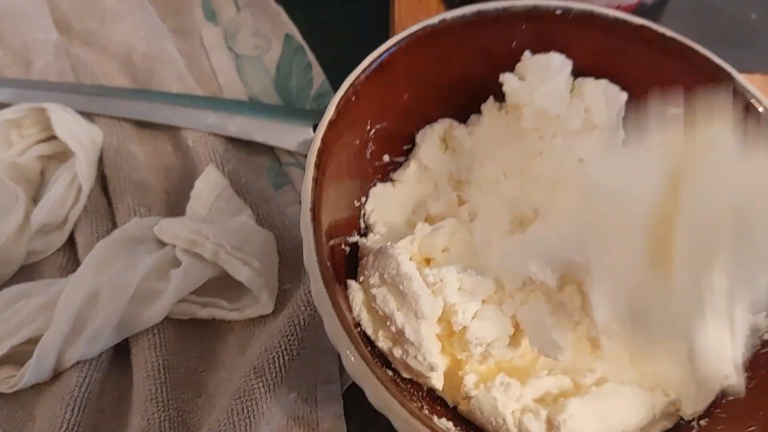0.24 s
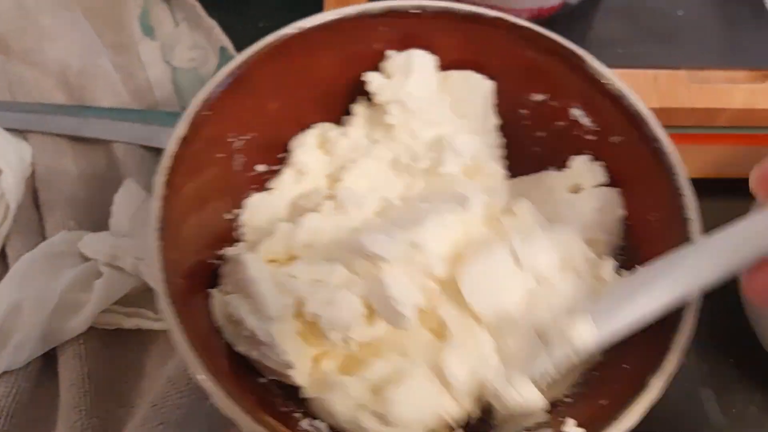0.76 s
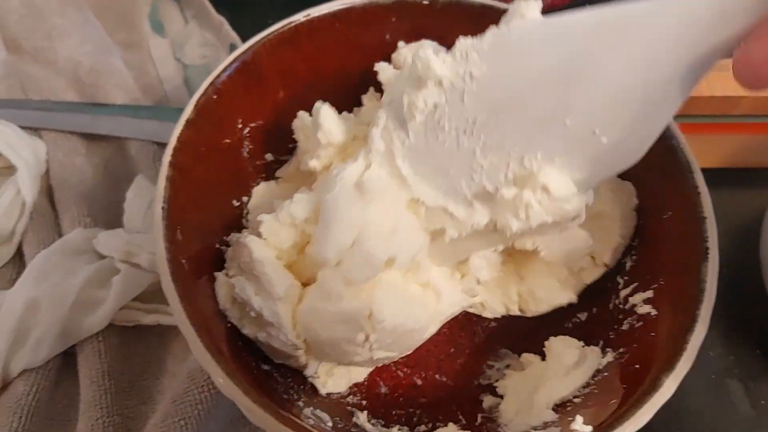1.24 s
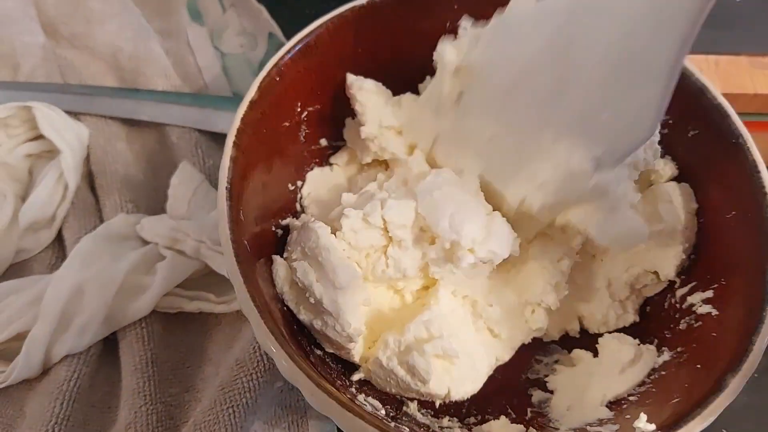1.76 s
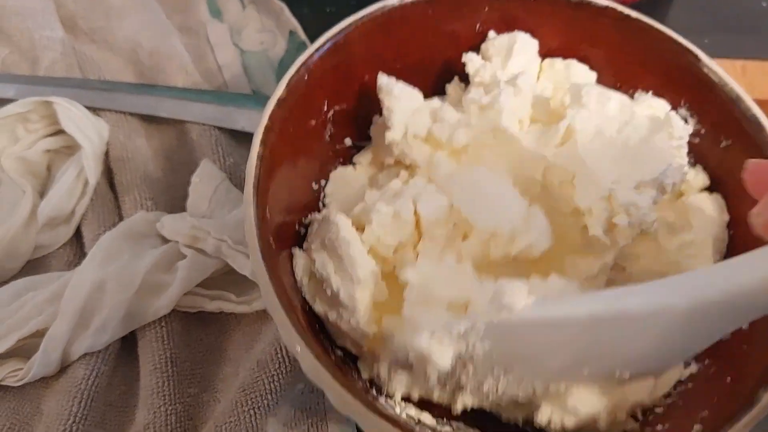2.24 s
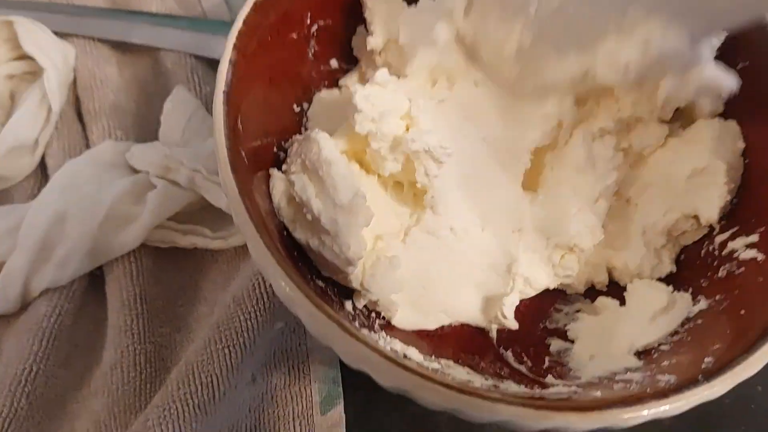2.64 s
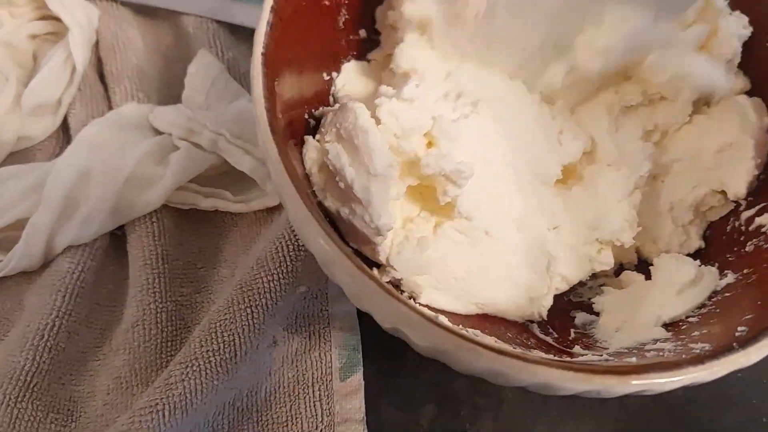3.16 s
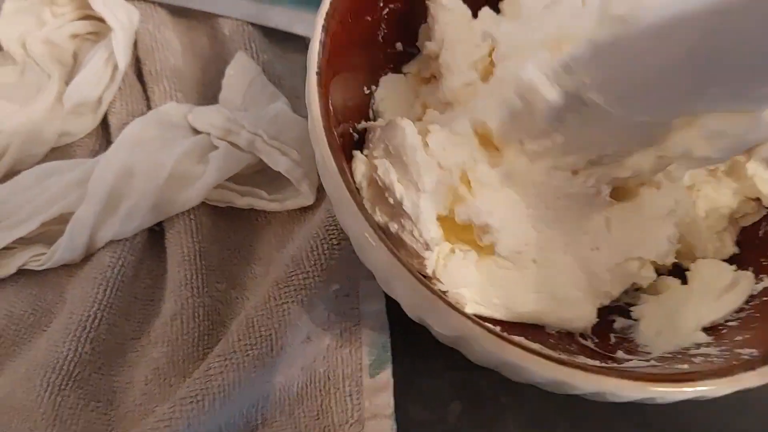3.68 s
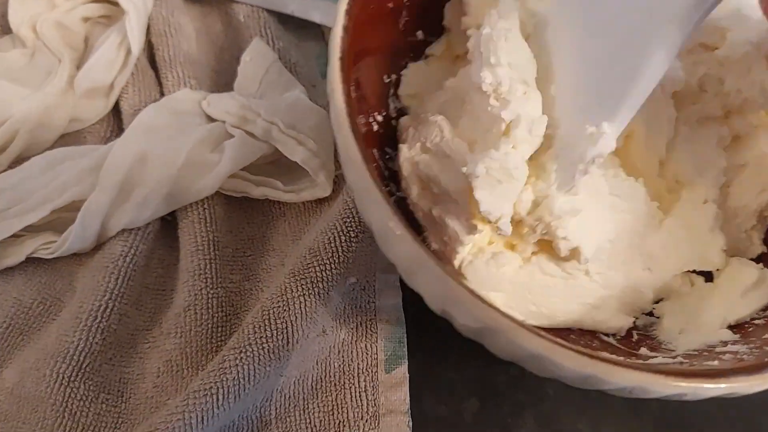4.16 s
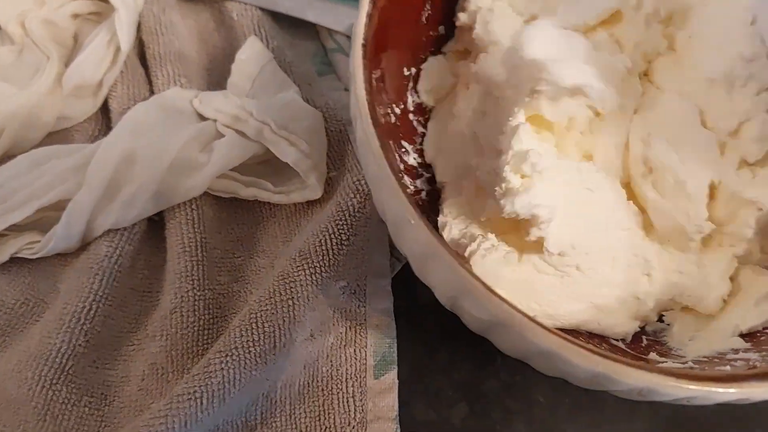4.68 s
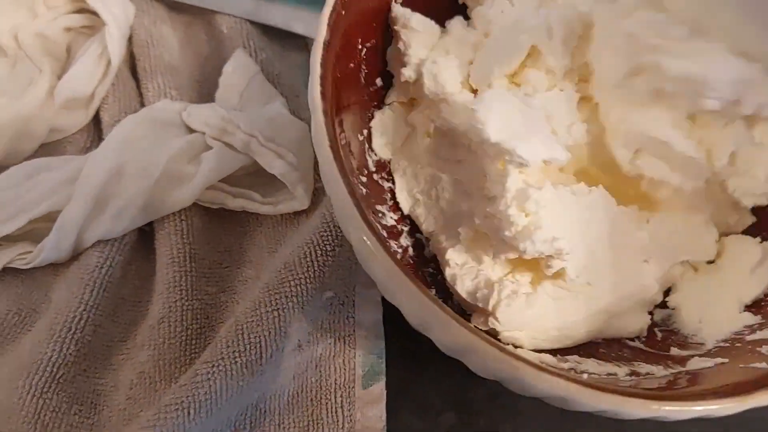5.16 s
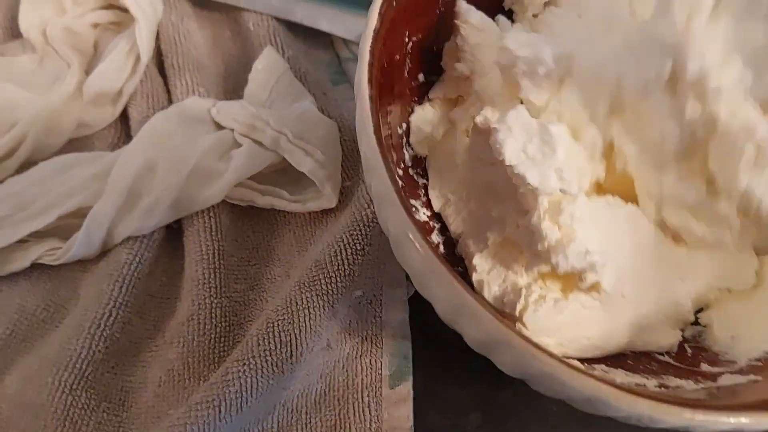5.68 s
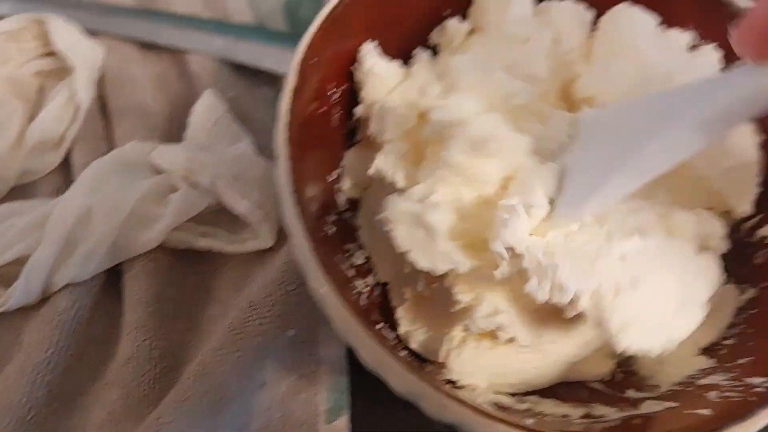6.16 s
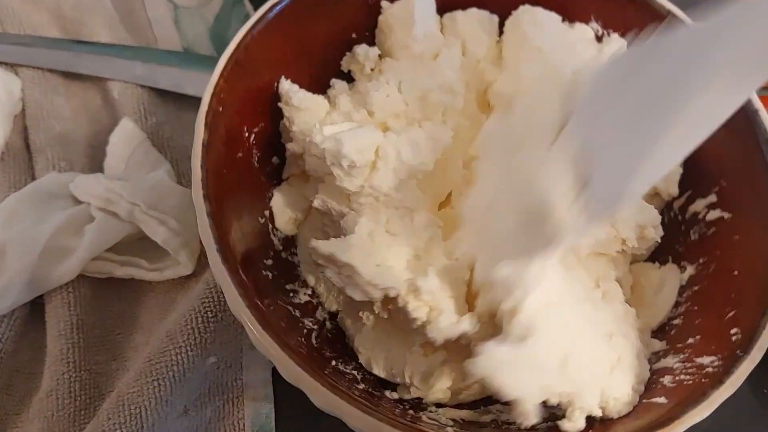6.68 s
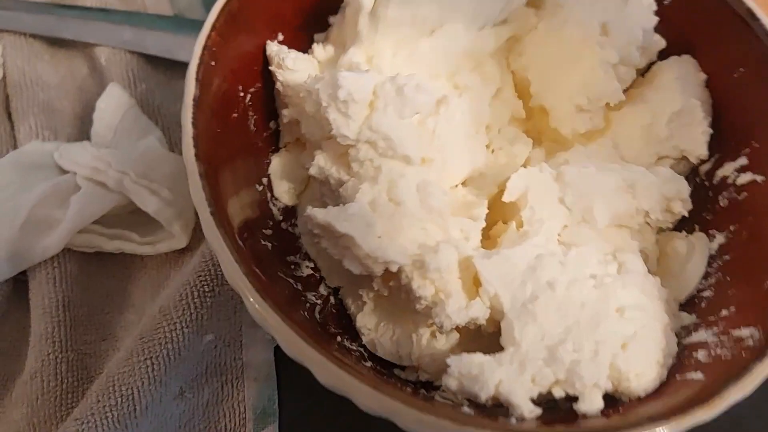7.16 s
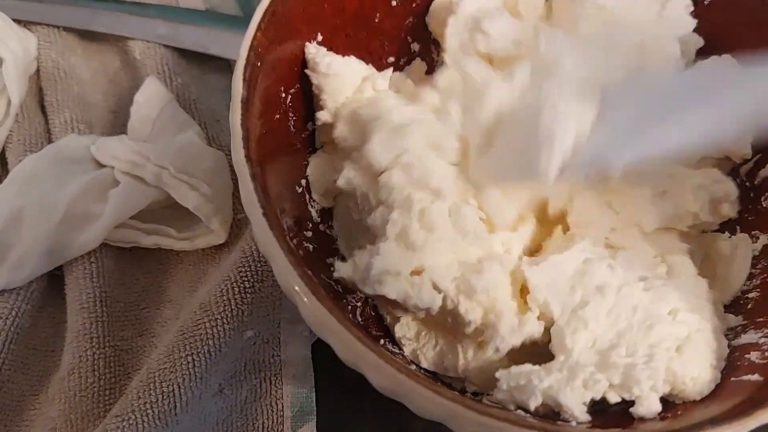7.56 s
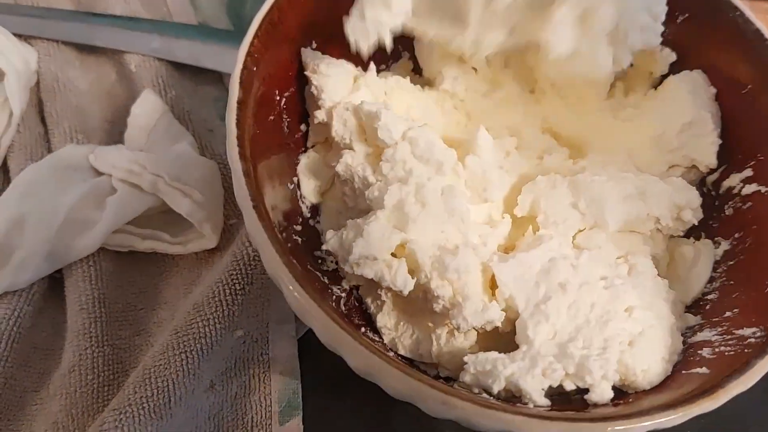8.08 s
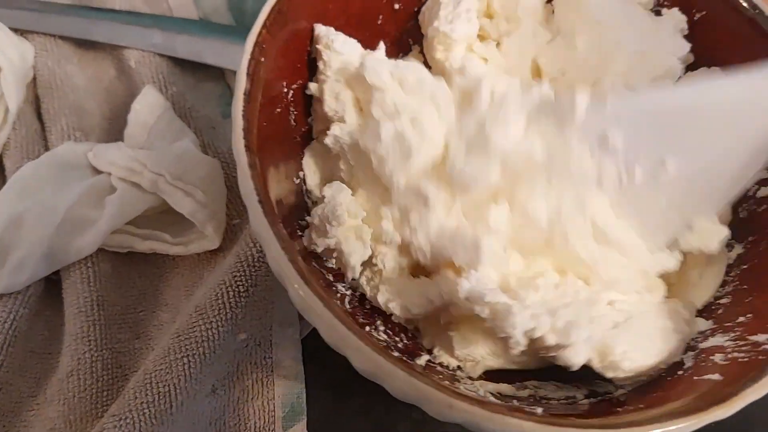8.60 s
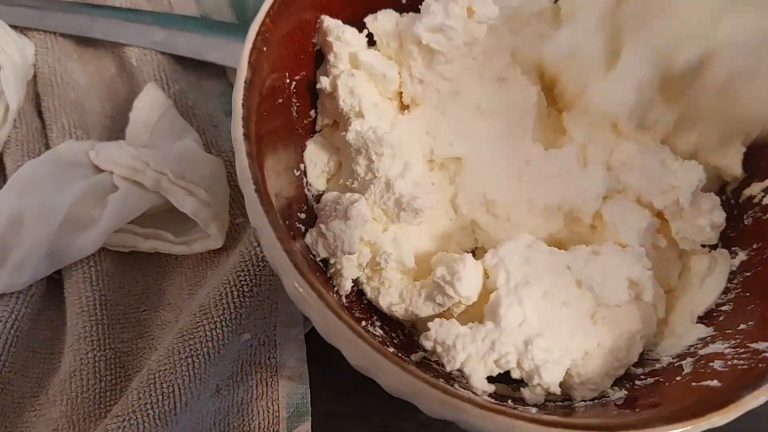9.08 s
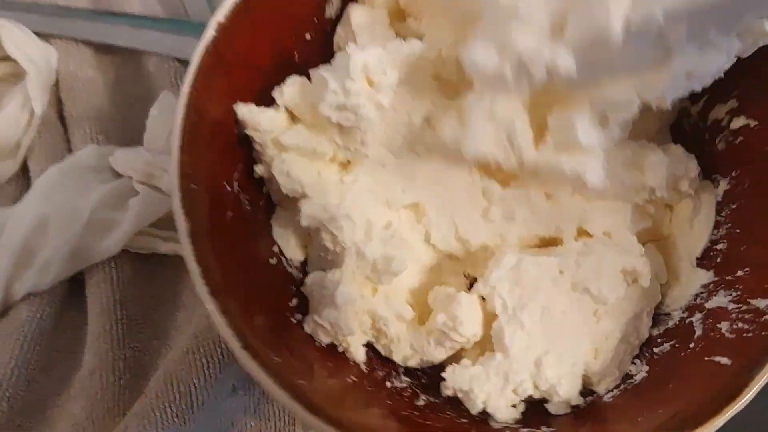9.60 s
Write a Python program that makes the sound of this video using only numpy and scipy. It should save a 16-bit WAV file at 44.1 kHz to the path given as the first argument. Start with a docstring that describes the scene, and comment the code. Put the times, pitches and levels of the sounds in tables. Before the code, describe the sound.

Close wet squishing and scraping of thick curd in a heavy bowl, broken by sudden loud ceramic clunks, with an appliance droning softly behind.

```python
"""First a kitchen hum starts a little quieter and comes up to its level while soft cheese fizzes; then a
spatula mashes it in a ceramic bowl on a towel. Wet curd smears and pops: showers of tiny clicks, rising notes
and short noise bursts. The blade rubs the glaze as filtered stick-slip clicks; the rim, the bowl and the
counter ring as fading tones. The hardest knocks overload the close phone microphone and make its gain control
duck."""
import sys
import numpy as np
from scipy import signal
from scipy.fft import rfft, irfft, next_fast_len
from scipy.io import wavfile
from scipy.ndimage import uniform_filter1d, minimum_filter1d, map_coordinates

SR = 44100
rng = np.random.default_rng(int(sys.argv[2]) if len(sys.argv) > 2 else 0)


def unload_wav(signal):
    """Save mono or channel-first audio to the path in sys.argv[1] as 16-bit WAV at rate SR, clipped to [-1, 1]."""
    wavfile.write(
        sys.argv[1],
        SR,
        np.round(np.clip(np.atleast_2d(signal).T, -1, 1) * 32767).astype(np.int16),
    )


N = 433944
TOP_HZ = 16000  # highest filter frequency, and where the microphone cuts the top
T = np.arange(N) / SR  # seconds
RING = T[:SR // 2]  # half a second, the longest that one blow or pop may last


def undb(db):
    """Turn decibels into gain."""
    return 10 ** (np.asarray(db) / 20)


def unit(x):
    """Scale to rms 1."""
    return x / np.sqrt(np.mean(x ** 2) + 1e-18)


def colour(x, points):
    """Shape the spectrum of x along a curve of (Hz, dB) points."""
    hz, db = np.transpose(points)
    length = x.shape[-1]
    padded_length = next_fast_len(length, True)
    padded = np.pad(x, [(0, 0), (0, padded_length - length)])
    bin_hz = np.fft.rfftfreq(padded_length, 1 / SR) + 1e-3  # keeps the logarithm finite
    gain = undb(np.interp(np.log(bin_hz), np.log(hz), db))
    return irfft(rfft(padded) * gain, padded_length)[:, :length]


def resonate(x, hz, width_hz):
    """Let x excite one resonance, with gain 1 at its centre."""
    sharpness = hz / min(width_hz, TOP_HZ)
    return signal.lfilter(*signal.iirpeak(min(hz, TOP_HZ), sharpness, fs=SR), x)


def soften(x, hz):
    """Roll off the treble gently above hz, as a soft contact does because it pushes longer."""
    return signal.lfilter(*signal.butter(1, min(hz, TOP_HZ), fs=SR), x)


def walk(rate):
    """Drift randomly in straight lines between `rate` knots per second, with a spread near 1."""
    knots = rng.standard_normal(N // 100)
    return 1.2 * np.interp(T * rate, np.arange(len(knots)), knots)


def pair(size, split_hz=650, likeness=0.77):
    """Make noise for two close microphones: alike in the bass, unrelated in the treble."""
    mid, side = rng.standard_normal((2, size))
    side = side - likeness * soften(side, split_hz)
    return np.array([mid + side, mid - side])


def add(out, s, sound):
    """Mix a sound in at time s."""
    start = int(np.clip(s * SR, 0, N - 1))
    out[:, start:start + sound.shape[-1]] += sound[:, :N - start]


def grains(rate, spread_db, shared=0.034):
    """Scatter clicks of uneven size, `rate` per second, partly heard by both microphones; rms 1."""
    size = undb(spread_db * np.minimum(rng.exponential(size=N), 6))
    struck = rng.random(N) < rate / SR
    chance = rng.standard_normal((3, N))
    return unit(size * struck * (chance[:2] + shared * chance[2]))


def ring(modes, lag_s, skew_limit=0.61, ring_times=1, spread=0.0028):
    """One blow sets off fading tones; neighbours swing opposite ways, a little out of step left to right."""
    hz, db, t60 = np.transpose(modes)[:, :, None]
    detune = 1 + spread * rng.standard_normal(hz.shape)
    turn = (-1) ** np.arange(len(hz))[:, None]
    skew = np.minimum(np.pi * hz * lag_s, skew_limit) * turn
    fade = turn * undb(db - 60 * RING / (t60 * ring_times))
    swing = 2 * np.pi * hz * detune * RING
    return np.array([(fade * np.sin(swing + way * skew)).sum(0) for way in (1, -1)])


def blow(x):
    """Scale a blow so that its first fiftieth of a second peaks near 1."""
    return x / (2.58 * np.sqrt(np.mean(x[:, :SR // 50] ** 2)))


def press(top_s, swell_s, release_s, roundness=1.03):
    """Force of one press: it builds until the curd gives way, then lets go (roundness 1: pointed, 2: round)."""
    away = np.maximum((top_s - T) / swell_s, (T - top_s) / release_s)
    return np.exp(-np.clip(away, 0, 6) ** roundness)


# The blade presses into the curd. Each row: hardest moment in seconds, swell in seconds,
# release in seconds, smear level in dB, fizz of tearing films in dB relative to the smear.
PRESSES = [(0.03, 0.033, 0.058, -56, 8), (0.41, 0.18, 0.079, -43.5, -7), (0.69, 0.58, 0.09, -40.5, -7.5),
           (0.9, 0.14, 0.32, -38, -1), (1.27, 0.16, 0.2, -39.5, -2), (1.745, 0.049, 0.075, -40.5, 3.5),
           (1.85, 0.13, 0.28, -43.5, -6), (2.42, 0.27, 0.12, -48.5, 2), (3.02, 0.57, 1, -45, -3),
           (3.47, 0.022, 0.074, -46, 2.5), (3.715, 0.054, 0.06, -36.5, -0.5),
           (4.21, 0.084, 0.13, -40, -2.5), (4.315, 0.029, 0.033, -37.5, -0.5),
           (4.72, 0.086, 0.19, -40.5, -6), (4.96, 0.11, 0.096, -38, -4), (5.24, 0.024, 0.015, -37, -2),
           (5.44, 0.035, 0.057, -40.5, -1.5), (5.66, 0.14, 0.089, -37, -7), (5.94, 0.11, 0.069, -38.5, -6),
           (6.34, 0.089, 0.041, -41, -5), (6.71, 0.095, 0.072, -34, -8), (7.02, 0.24, 0.25, -44, -10),
           (7.36, 0.14, 0.13, -42.5, -2), (8.04, 0.33, 0.1, -44, -3.5), (8.32, 0.017, 0.19, -43, -14),
           (8.77, 0.58, 0.14, -46.5, -4), (9.57, 0.16, 0.047, -40, -4.5), (9.695, 0.028, .025, -46, 0)]
# Tone colour of the smear. Each row: frequency in Hz, relative level in dB.
SMEAR_COLOUR = [(300, 18.5), (900, 1.5), (2200, 1), (3300, -1), (4700, 1.5), (8000, -11), (9400, -12),
                (16000, -21)]
# Tone colour of the fizz. Each row: frequency in Hz, relative level in dB.
FIZZ_COLOUR = [(2000, -9.5), (6000, -3), (8200, 0.5), (9400, -10), (11000, -1), (12600, 0), (16000, 0)]


def curd(creep_smear_db=-46.5, creep_fizz_db=-55, flicker_db=2.5):
    """Countless tiny films tear under the blade: a dense smear with a finer fizz on top, in small spurts."""
    # between presses the blade keeps creeping through the cheese
    smear_power, fizz_power = undb(creep_smear_db) ** 2, undb(creep_fizz_db) ** 2
    for top_s, swell_s, release_s, db, fizz_db in PRESSES:
        tearing = undb(db) * press(top_s, swell_s, release_s)
        smear_power = smear_power + tearing ** 2
        fizz_power = fizz_power + (tearing * undb(fizz_db)) ** 2
    smear = unit(colour(grains(rate=9000, spread_db=1.0), SMEAR_COLOUR)) * np.sqrt(smear_power)
    fizz = unit(colour(grains(rate=5000, spread_db=0.5), FIZZ_COLOUR)) * np.sqrt(fizz_power)
    return (smear + fizz) * undb(flicker_db * walk(45))


# Air pockets pop in the curd. Each row: start in seconds, level in dB before the common trim,
# starting pitch in Hz.
POPS = [(0.195, -23.5, 3100), (0.816, -15.5, 2410), (0.817, -25, 4800), (0.845, -31, 5240),
        (0.816, -18, 11800), (0.843, -29, 1720), (0.857, -25.5, 2150), (0.858, -28, 1590),
        (0.895, -32, 1890), (1.478, -26, 11000), (1.808, -22, 6700), (2.852, -25, 5000),
        (3.304, -21.5, 6700), (3.304, -30, 3160), (3.698, -18, 12000), (3.7155, -24, 5030),
        (3.7165, -31, 1890), (3.724, -24, 1650), (4.123, -31, 5100), (4.308, -37, 2720),
        (5.415, -26.5, 2240), (6.673, -16.5, 4250), (7.386, -21, 12000), (8.304, -24, 7500),
        (8.647, -25, 1750), (8.803, -27, 12000), (9.157, -22, 7940), (9.707, -26, 8900)]


def pops(cycles=55, width=0.21, note_share=0.37, rise_per_s=6, splash_db=-19, splash_t60_s=0.07, trim_db=-11.5):
    """Each pocket bursts with a tiny rising note, small ones die fastest, and leaves a brief wet splash."""
    out = np.zeros((2, N))
    for s, db, hz in POPS:
        chance = rng.standard_normal((3, len(RING)))
        burst = unit(resonate(chance[:2] + chance[2], hz, width * hz))
        note = np.sqrt(2) * np.sin(2 * np.pi * hz * RING * (1 + rise_per_s * RING / 2))
        fade = undb(-60 * RING * hz / cycles)  # 60 dB down after this many cycles
        pop = (np.sqrt(note_share) * note + np.sqrt(1 - note_share) * burst) * fade
        splash = burst * undb(splash_db - 60 * RING / splash_t60_s)
        add(out, s, undb(db + trim_db) * (pop + splash))
    return out


# The blade rubs over the glaze. Each row: start in seconds, strongest moment in seconds, end in seconds,
# level in dB, centre at the start in Hz, width in Hz, slide in octaves.
RUBS = [(0.191, 0.28, 0.64, -36, 610, 247, -.35), (0.268, 0.37, 0.55, -41, 740, 200, -.3),
        (0.3, 0.33, 0.75, -51, 1080, 380, -0.23), (0.828, 0.848, 0.885, -42, 1950, 900, 0.022),
        (0.768, 0.827, 0.92, -36, 310, 560, -0.016), (1.06, 1.212, 1.6, -46.5, 3400, 4600, 0.0066),
        (4.19, 4.207, 4.27, -41, 6000, 11000, 0.045), (4.901, 4.95, 4.99, -46, 1000, 1000, 0.24),
        (5.444, 5.492, 5.53, -35.5, 537, 540, -0.015), (5.449, 5.478, 5.5, -29.5, 315, 140, -0.029),
        (6.26, 6.33, 6.37, -51, 1290, 800, 0.024), (6.655, 6.675, 6.695, -41.5, 2490, 200, 0.083),
        (7.28, 7.294, 7.315, -46, 1400, 1130, -0.044), (9.29, 9.34, 9.42, -27.5, 249, 210, -0.0043),
        (9.39, 9.417, 9.55, -32.5, 250, 248, 0.024), (9.276, 9.33, 9.42, -42.5, 1020, 430, -0.044),
        (9.343, 9.425, 9.54, -46, 690, 1100, 0)]


def rubs(slips_per_s=3000, landing=0.25, cushion=2.0, lumps_db=1.1):
    """The blade sticks and slips over lumpy cheese: it lands, presses harder, lifts; its bend slides the pitch."""
    out = np.zeros((2, N))
    slips = grains(slips_per_s, spread_db=0.7, shared=0.77) * undb(lumps_db * walk(70))
    for start, top, end, db, hz, width_hz, octaves in RUBS:
        t = T[int(start * SR):int(end * SR)]
        stroke = np.interp(t, [start, top, end], [landing, 1, 0])
        # reading the scrape faster or slower slides its pitch
        travel = np.cumsum(2 ** np.linspace(0, octaves, len(t)))
        path = slips[:, int(start * SR):][:, :int(travel[-1]) + 2]
        scrape = resonate(soften(path, cushion * hz), hz, width_hz)
        scrape = resonate(scrape, hz, 2 * width_hz)
        scrape = np.array([map_coordinates(channel, [travel], order=3) for channel in scrape])
        add(out, start, undb(db) * stroke * unit(scrape))
    return out


# Tone colour of the short contact noise. Each row: frequency in Hz, relative level in dB.
CRACK_COLOUR = [(100, -26), (200, 8), (450, 9.5), (1000, 2), (2500, -8.5), (5000, -21.5), (9000, -20),
                (16000, -13)]


def crack(db, t60_s):
    """Two hard surfaces meet: a short fading burst of coloured noise."""
    return unit(colour(pair(len(RING)), CRACK_COLOUR)) * undb(db - 60 * RING / t60_s)


# The spatula clacks on the rim. Each row: start in seconds, level in dB, contact sharpness in Hz,
# ring time as a multiple (short while the blade stays pressed on).
CLACKS = [(0.195, -32, 3500, .45), (0.961, -21.5, 5000, .8), (0.965, -17, 5000, .85),
          (0.977, -20, 3000, .7), (3.4974, -32, 1000, .16), (3.715, -29.5, 2600, .12),
          (6.602, -23.5, 1690, 2), (6.6185, -25, 1300, 1.7), (6.640, -28, 1300, 1.4),
          (6.679, -27, 2000, .8)]
# What that contact rings with. Each row: frequency in Hz, relative level in dB,
# time to fade by 60 dB in seconds before the clack's multiple.
RIM_TONES = [(298, -5, 0.03), (554, 0, 0.15), (700, -12, 0.055), (930, -7, 0.094), (1210, -12, 0.038),
             (1330, -4.5, 0.12), (1620, -10, 0.082), (1796, -3, 0.12), (2370, -15, .045), (2470, -8, .04),
             (2956, -9.5, 0.078), (3510, -12, .04), (4370, -10.5, 0.053)]


def clacks(tick_db=0, tick_t60_s=0.061):
    """The stiff handle strikes the rim and chatters along it; the rim rings on when the blade lifts away."""
    out = np.zeros((2, N))
    for s, db, sharp_hz, ring_times in CLACKS:
        tick = crack(tick_db, tick_t60_s * min(ring_times, 1))
        rim = ring(RIM_TONES, lag_s=0.00031, ring_times=ring_times)
        clack = soften(soften(rim + tick, sharp_hz), sharp_hz)
        add(out, s, undb(db) * blow(clack))
    return out


def roll(end_hz, swell_s, lag_s=0.00048, start_ratio=1.51, settle_share=0.46):
    """The foot of the bowl rolls into the towel: a hollow note that swells, drops in pitch and dies."""
    age = RING / swell_s
    # the note starts higher by start_ratio and settles within settle_share of its swell
    hz = end_hz * (1 + (start_ratio - 1) * np.exp(-age / settle_share))
    skew = np.pi * end_hz * lag_s * np.array([[1], [-1]])
    swell = age * np.exp((1 - age ** 2) / 2)
    return swell * np.sin(2 * np.pi * np.cumsum(hz) / SR + skew)


# The bowl rocks onto the counter. Each row: start in seconds, blow level in dB, contact sharpness in Hz,
# thump of the counter in dB relative to the blow and before its common boost, left minus right in dB,
# rolling note of the foot in dB, pitch it settles on in Hz, its swell in seconds.
KNOCKS = [(0.583, -26.5, 400, -6, 5, -29, 383, 0.018), (1.716, -33, 890, -18, 0, -43, 399, 0.012),
          (2.354, -32, 400, -7, 0, -36, 396, 0.011), (3.4963, -38, 1000, 3, -1, -35, 271, 0.008),
          (3.639, -25, 1500, -10, 3, -25.5, 513, 0.0068), (3.644, -26.5, 500, -8, -2.5, -18, 368, 0.0094),
          (3.670, -27, 500, -10, 2, -22.5, 327, 0.0071), (4.282, -16, 2600, -12, 0.5, -13.5, 386, .012),
          (4.306, -18.5, 710, -11.5, 5, -17.5, 326, 0.0077), (4.657, -28.5, 1100, -5, 4, -23.5, 387, 0.015),
          (4.915, -28.5, 380, -3.5, 4, -34, 328, 0.019), (5.0795, 3, 4400, -24.5, 0.5, 2.5, 420, 0.0084),
          (5.109, -29, 600, 4, 2, -25, 327, 0.0047), (5.135, -33, 400, 5, 3, -25, 430, .008),
          (5.299, -18, 2300, -11, 0.5, -14.5, 373, 0.012), (5.326, -31.5, 500, -2, 3, -21.5, 286, 0.0061),
          (6.657, -13.5, 1900, -10, 2, -8.5, 392, 0.0096), (6.681, -23, 500, -18, 3.5, -19, 272, 0.0064),
          (7.4504, -3.5, 1500, -10, -1, -8, 612, 0.0052), (7.465, -19.5, 597, -7, -3.5, -5.5, 395, 0.0082),
          (7.482, -27, 400, 3.5, 2, -11.5, 235, 0.011), (7.51, -32, 500, -5, 3, -26, 420, .013),
          (8.61, -26, 1100, -7.5, -1, -21.5, 395, 0.0091), (9.758, 3.5, 3440, -24.5, 2, 3, 421, 0.0053)]
# The loaded bowl on the counter. Each row: frequency in Hz, relative level in dB,
# time to fade by 60 dB in seconds.
BOWL_TONES = [(218.5, -15, 0.26), (278, -18, 0.27), (331, -8.5, 0.19), (371, -12, 0.38),
              (427.3, -3.5, 0.14), (470, 3, 0.013), (564, -10, 0.14), (617, -4.5, 0.084),
              (682, -11.5, 0.15), (828, -11.5, 0.11), (975, -6, 0.042), (1064, -5.5, 0.076),
              (1140, -12.5, 0.074), (1343, -7, 0.046), (1594, 0.5, 0.02), (1678, -9, 0.05),
              (1980, -8, 0.038), (2543, -13, 0.056), (2910, -13, 0.032), (3450, -14, .02),
              (4660, -22, 0.045)]
# The dull shudder that follows a knock. Each row: frequency in Hz, relative level in dB.
SHUDDER_COLOUR = [(60, -28), (160, -3), (260, -15.5), (420, -8), (900, -15), (1800, -24), (3500, -32),
                  (16000, -67)]
# The counter under the towel. Each row: frequency in Hz, relative level in dB, time to fade by 60 dB in seconds.
COUNTER_TONES = [(68.6, -8.5, 0.28), (88, -7.5, 0.12), (146.4, 4, 0.094), (255.5, 1.5, 0.16)]


def knocks(crack_db=-2, crack_t60_s=0.049, shudder_db=-17, shudder_t60_s=0.24, rattle_db=4.0,
           push_cycles=8.4, thump_rise_s=0.0046, thump_boost_db=6.0):
    """The bowl lands with a crack, rings, damped by cheese, and rolls on its foot; the counter thumps late."""
    out = np.zeros((2, N))
    for s, db, sharp_hz, thump_db, left_db, roll_db, roll_hz, swell_s in KNOCKS:
        shudder_fade_db = shudder_db - 60 * RING / shudder_t60_s + rattle_db * walk(78)[:len(RING)]
        shudder = unit(colour(pair(len(RING)), SHUDDER_COLOUR)) * undb(shudder_fade_db)
        # the shifting cheese retunes the bowl a little at each landing
        bowl = ring(BOWL_TONES, lag_s=0.00028, spread=0.011)
        # a landing cushioned by the towel builds up slowly and stays dull
        body = (bowl + shudder) * (1 - np.exp(-RING * sharp_hz / push_cycles))
        body = body + crack(crack_db, crack_t60_s)
        body = blow(soften(soften(body, sharp_hz), sharp_hz))
        counter = ring(COUNTER_TONES, lag_s=0.00018) * (1 - np.exp(-RING / thump_rise_s))
        thump = counter * undb(thump_db + thump_boost_db)
        knock = undb(db) * (body + thump) + undb(roll_db) * roll(roll_hz, swell_s)
        balance = undb(np.array([[left_db], [-left_db]]) / 2)
        add(out, s, balance * knock)
    return out


# A knock that shakes the cheese off the wall lets it sing on. Each row: start in seconds, level in dB,
# pitch in Hz, time to fade by 60 dB in seconds.
WALL_RINGS = [(6.679, -35, 552, 0.86), (5.081, -22, 2600, 0.12), (5.299, -41, 2570, 0.12),
              (7.45, -31.5, 2544, 0.19), (7.451, -43, 4480, 0.075), (9.759, -32, 2570, 0.4)]


def wall():
    """The freed ceramic wall rings with a thin clear note."""
    out = np.zeros((2, N))
    for s, db, hz, t60 in WALL_RINGS:
        add(out, s, ring([(hz, db, t60)], lag_s=0.00006))
    return out


def room(x, wet_db=-19, t60_s=0.22):
    """Tiles and cupboards return a short dull tail."""
    tail = soften(pair(len(RING)), 1760) * undb(-60 * RING / t60_s)
    tail = tail * (RING > 0.006)  # the first echo comes a little late
    tail /= np.sqrt(np.sum(tail ** 2) / 2)
    return x + undb(wet_db) * signal.fftconvolve(x, tail, axes=1)[:, :N]


# The bowl radiates unevenly towards the two microphones. Each row: frequency in Hz, left minus right in dB.
LEFT_RIGHT_TILT = [(150, -3), (300, -5), (600, -4.5), (1200, 2), (2400, 1.5), (5000, 2.5), (16000, 2.5)]


def lean(x):
    """Uneven radiation colours the two channels in opposite ways, half of the tilt each."""
    tilt = np.array(LEFT_RIGHT_TILT)
    left = colour(x[:1], tilt * [1, 0.5])
    right = colour(x[1:], tilt * [1, -0.5])
    return np.vstack([left, right])


# Tone colour of the kitchen air. Each row: frequency in Hz, relative level in dB.
AIR_COLOUR = [(20, -31), (45, -56), (70, -4.5), (115, -5), (150, 6), (200, -2), (240, -2.5), (340, -7.5),
              (480, -20), (950, -41.5), (2200, -35), (7500, -32), (9400, -39), (12500, -34.5), (16000, -46)]
# Tones of an appliance motor. Each row: centre frequency in Hz, level in dB, width of the pitch drift in Hz.
MOTOR_TONES = [(73.8, -83, 4), (101, -48.5, 1.5), (143.7, -40, 5), (239, -47, 5.4), (301, -51.5, 3)]
# Air whistles faintly in the appliance's fan duct. Each row: frequency in Hz, level in dB, width in Hz.
DUCT_WHISTLES = [(685, -59.5, 66), (1196.4, -57, 37), (1665, -65.5, 23), (2183, -61, 140), (2750, -70, 67)]


def kitchen(air_db=-37.0, start_db=-4, swell_s=0.55):
    """An appliance drones with wavering tones over rushing air and duct whistles; the hum starts a little
    quieter and reaches its level within half a second."""
    out = unit(colour(pair(N, split_hz=1700), AIR_COLOUR)) * undb(air_db)
    for hz, db, width_hz in MOTOR_TONES:
        drifting_hz = hz + width_hz / 2 * walk(3 * width_hz)
        phase = 2 * np.pi * np.cumsum(drifting_hz) / SR
        out += np.sqrt(2) * undb(db + 1.85 * walk(2 * width_hz)) * np.sin(phase)
    draught = pair(N)
    for hz, db, width_hz in DUCT_WHISTLES:
        out += undb(db) * unit(resonate(draught, hz, width_hz))
    return out * undb(np.interp(T, [0, swell_s], [start_db, 0]))


def scene():
    """Everything that happens in the bowl, in the humming kitchen."""
    bowl = curd() + pops() + rubs() + clacks() + knocks() + wall()
    return lean(room(bowl)) + kitchen()


def gain_control(x, threshold_db=-14, slope=0.39, recover_db_per_s=6.0, attack_s=0.0066, hold_samples=36001):
    """Loud moments turn the gain down; it holds for most of a second and then creeps back."""
    power = uniform_filter1d(np.mean(x ** 2, 0), SR // 100)
    loud_db = 10 * np.log10(np.maximum(power, 1e-12))
    headroom_db = np.minimum(threshold_db - loud_db, 0)  # negative when too loud
    # the shifted window looks back in time, which holds each cut
    held_db = minimum_filter1d(headroom_db, hold_samples, origin=hold_samples // 2, mode="constant")
    recovery_db = recover_db_per_s * T
    cut_db = np.maximum.accumulate(-slope * held_db + recovery_db) - recovery_db
    return x * undb(-soften(cut_db, 1 / (2 * np.pi * attack_s)))


def record(dry, low_hz=46):
    """The phone sheds the deep bass, ducks after hard knocks, clips what is still too loud and cuts the top."""
    heard = signal.sosfilt(signal.butter(3, low_hz, "high", fs=SR, output="sos"), dry)
    clipped = np.clip(gain_control(heard), -1, 1)
    return signal.sosfilt(signal.ellip(10, 0.2, 70, TOP_HZ, fs=SR, output="sos"), clipped)


dry = scene()
out = record(dry)
unload_wav(out)
```